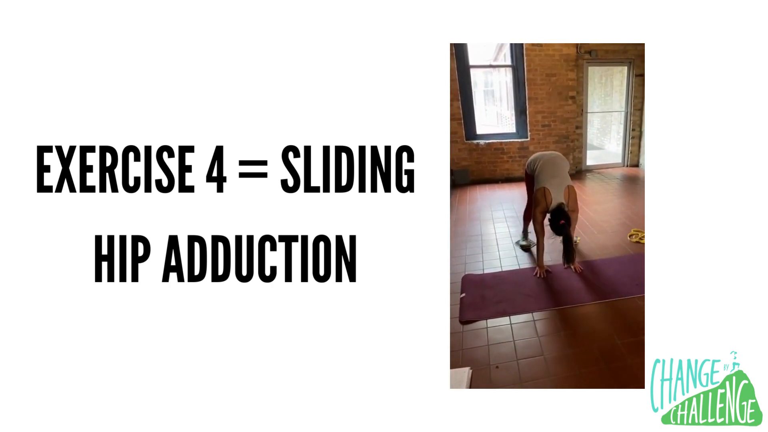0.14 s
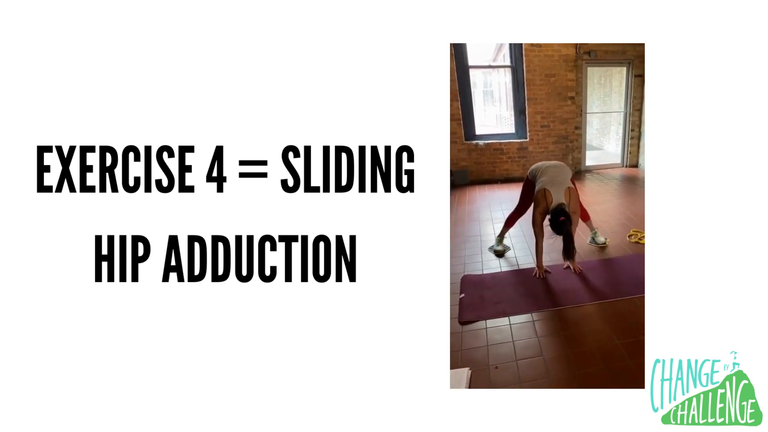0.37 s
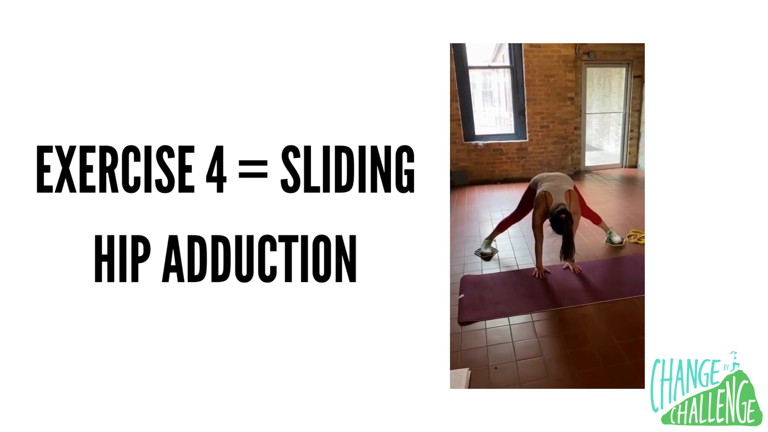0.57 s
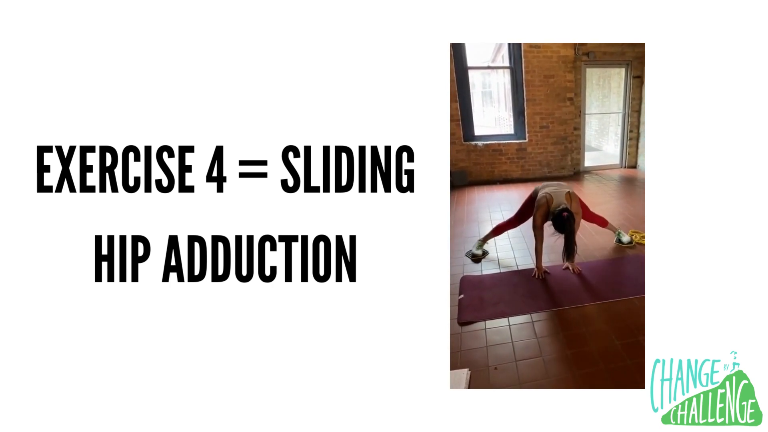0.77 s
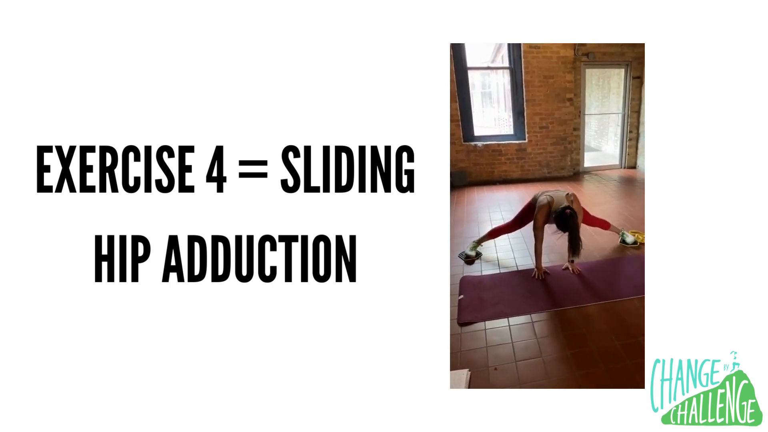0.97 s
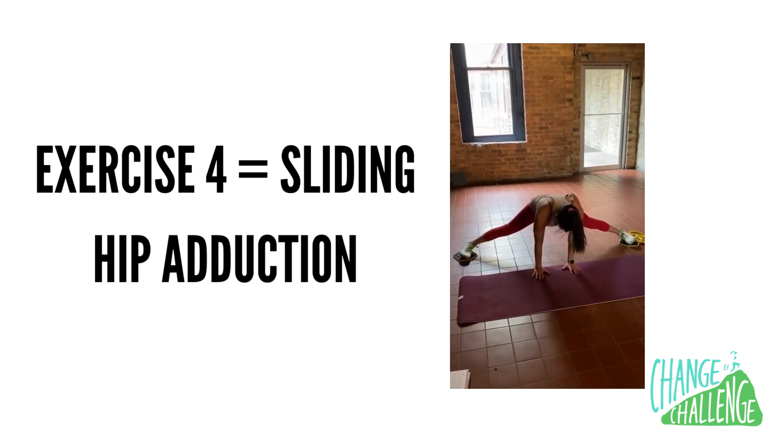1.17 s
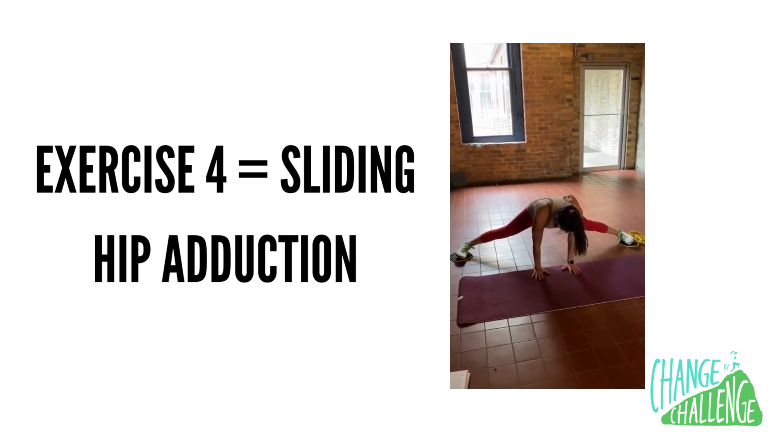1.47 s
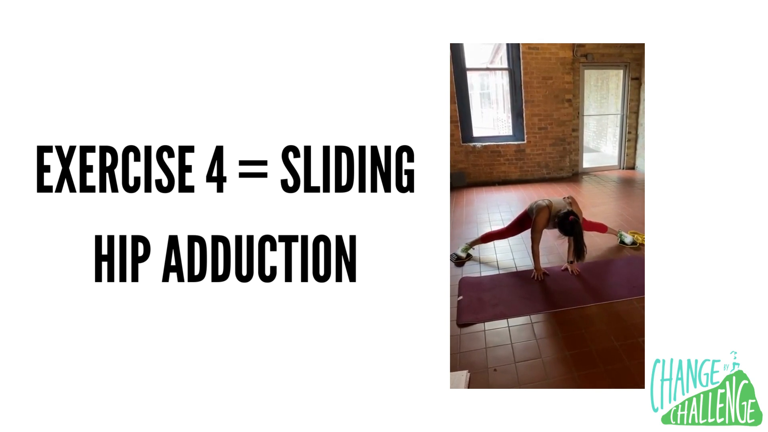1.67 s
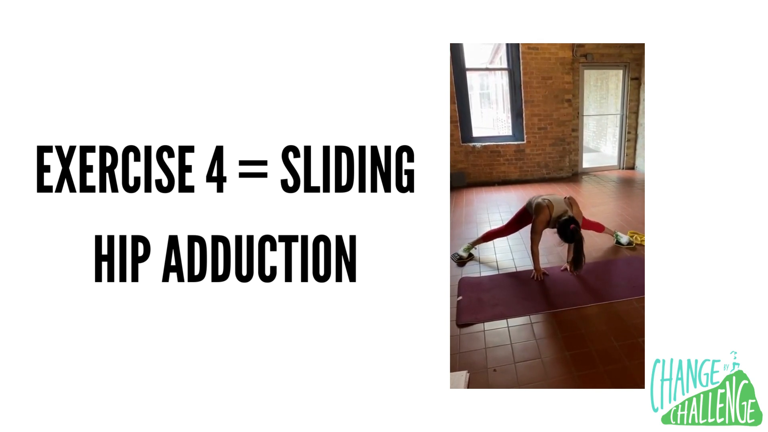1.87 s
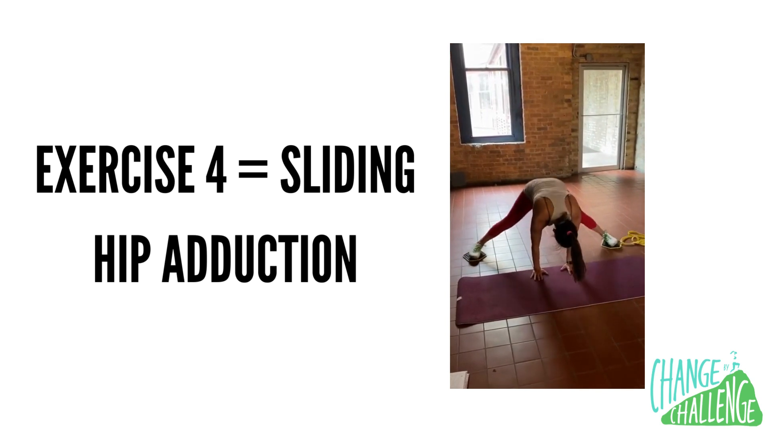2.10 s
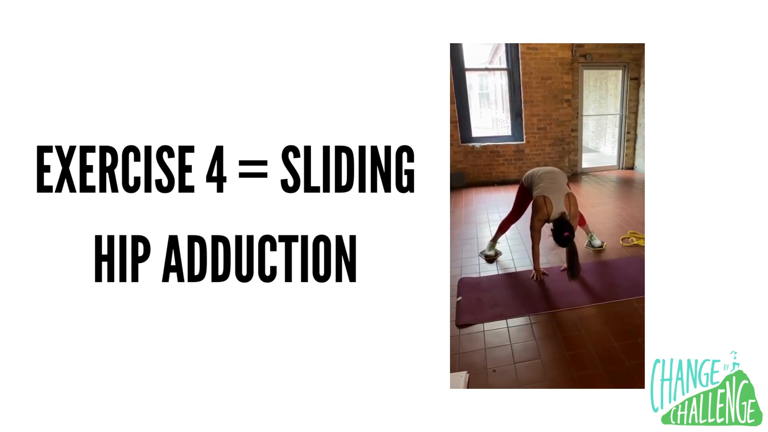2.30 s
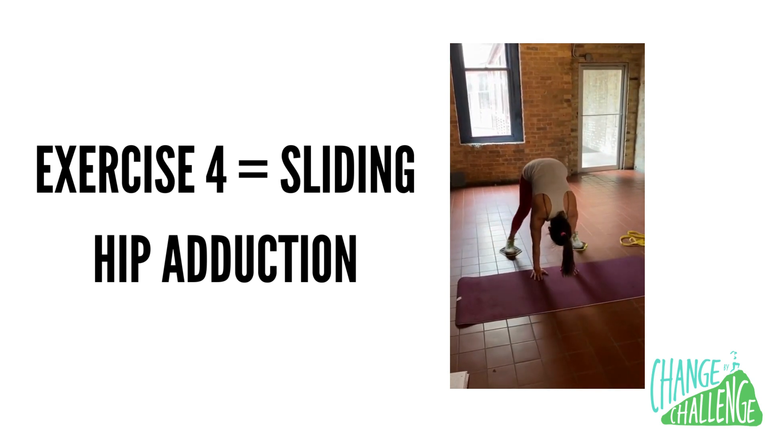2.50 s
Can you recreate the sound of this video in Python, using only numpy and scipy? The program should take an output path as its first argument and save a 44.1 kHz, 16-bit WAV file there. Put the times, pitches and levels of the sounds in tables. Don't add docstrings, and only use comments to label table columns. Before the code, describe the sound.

Felt sliders scrape out across a gritty tile floor, stop, then scrape back in, louder and brighter

```python
import sys
import numpy as np
from scipy import signal
from scipy.fft import rfft, irfft
from scipy.io import wavfile
from scipy.ndimage import uniform_filter1d

SR = 44100
rng = np.random.default_rng(int(sys.argv[2]) if len(sys.argv) > 2 else 0)


def elevation(decibels):
    levels = np.asarray(decibels, float)
    return 10 ** (levels / 20)


def master_out(mix):
    frames = np.transpose(np.atleast_2d(mix))
    ceiling = np.clip(frames, -1, 1)
    pcm = np.round(ceiling * 32767).astype(np.int16)
    wavfile.write(sys.argv[1], SR, pcm)


N = 116865
T = np.arange(N) / SR
F = np.fft.rfftfreq(N, 1 / SR) + 1e-3


def set_rms(x, db):
    return x * elevation(db) / np.sqrt(np.mean(x ** 2))


def curve(table):
    hz, value = np.array(table).T
    return np.interp(np.log(F), np.log(hz), value)


def shape(x, gain):
    return irfft(rfft(x) * gain, N)


def walk(rate):
    hold = int(SR / rate)
    steps = np.repeat(rng.standard_normal(400)[:N // hold + 1], hold)
    return 1.4 * uniform_filter1d(uniform_filter1d(steps, hold), hold)[:N]


def move_bands(x, centres, db_of):
    position = np.interp(np.log(F), np.log(centres), np.arange(len(centres)))
    out = 0
    for k, hz in enumerate(centres):
        band = shape(x, np.clip(1 - abs(position - k), 0, 1))
        out = out + elevation(db_of(hz)) * band
    return out


# frequency in Hz, level in dB, wobble in dB.
HUM_LINES = [(121.5, -41.5, 0.4), (239, -59.5, 3.5), (356.5, -55, 0.5), (275.2, -59.5, 4), (158, -53, 4),
             (71, -51.5, 5)]


def hum():
    out = 0
    for hz, db, wobble_db in HUM_LINES:
        gain = np.sqrt(2) * elevation(db + wobble_db * walk(12.4))
        drifting_hz = hz * (1 + .004 * walk(9.8))
        out = out + gain * np.sin(2 * np.pi * np.cumsum(drifting_hz) / SR)
    return out


# frequency in Hz, level in dB per Hz.
AIR_SPECTRUM = [(22, -49), (36, -21), (56, 1), (150, -8.5), (375, -19), (730, -29.5), (1420, -41),
                (5500, -63.5), (9000, -85.5)]


def air():
    noise = set_rms(shape(rng.standard_normal(N), elevation(curve(AIR_SPECTRUM))), -40)
    flicker_db = 2.05
    return move_bands(noise, 30 * 2 ** np.arange(0, 9.), lambda hz: flicker_db * walk(2.7))


def decay(t60):
    return rng.standard_normal(N) * elevation(-60 * T / t60) * (T > .008)


def room(x):
    places = 4
    low_pass = 1 / (1 + (F / 2500) ** 4)
    position = np.linspace(0, places - 1, N)
    out = 0
    for place in range(places):
        echo = shape(decay(1.03), low_pass) + shape(decay(.55), 1 - low_pass)
        echo = echo / np.sqrt(np.sum(echo ** 2))
        near = np.sqrt(np.clip(1 - abs(position - place), 0, 1))
        out = out + signal.fftconvolve(x * near, echo[:N // 2])[:N]
    return out


def in_room(x):
    wet = elevation(-8)
    return (x + wet * room(x)) / np.sqrt(1 + wet ** 2)


# time in seconds, level in dB, pitch in Hz.
GROUT_LINES = [
    (.11, -75, 495),
    (0.332, -41, 412.4),
    (.37, -40, 470),
    (.55, -47, 580),
    (.71, -43.5, 480),
    (2.12, -48.5, 410),
    (2.45, -43, 700),
]


def joints():
    noise = rng.standard_normal(N)
    out = 0
    for start, db, hz in GROUT_LINES:
        resonance = 1 / (1 + ((F - hz) / (0.027 * hz)) ** 2)
        out = out + set_rms(shape(noise, resonance), db) * np.exp(-((T - start) / 0.02) ** 2)
    return out


# time in seconds, scrape level in dB, brightness in dB per octave,
# pad ring in dB, pad ring pitch in Hz.
STROKES = [(0, -66.5, -14.5, 1, 2000), (.07, -63.5, 2, .1, 2200), (.098, -50.5, .1, 2, 2200),
           (0.113, -38.5, -0.2, 3.5, 2350), (.2, -34, -0.7, 3.5, 2400), (0.258, -28.5, 0.04, 2.3, 2180),
           (.44, -27.5, 0.64, 3, 2600), (.6, -31, 0.46, 5, 1900), (1.04, -44, -0.8, -0.1, 2220),
           (1.15, -57, 2.7, 5, 2200), (1.45, -51, 0.9, -1.5, 2200), (1.6, -64.5, 1.5, 6, 2200),
           (1.84, -87.5, -1, -2.5, 2200), (1.89, -64.5, 5, 4, 2200), (1.99, -44.5, 0.7, -1, 2400),
           (2.33, -33.5, 0.44, 2.7, 2100), (2.44, -34, 0.34, 0.8, 2200), (2.6, -31, 0.4, 4.5, 1670)]
# frequency in Hz, level in dB per Hz.
SCRAPE_SPECTRUM = [(150, -36), (300, -12.5), (1200, -4.5), (1520, -2), (2900, -3), (4400, -6.5),
                   (9500, -15), (15500, -28)]
# frequency in Hz, width in Hz, height in dB.
RINGS = [(2400, 1400, 2), (1700, 250, 0), (2820, 120, -1), (5300, 870, 5), (6510, 720, 3.5),
         (750, 150, 2.5)]


def scrape():
    grit_per_s, grit_spread_db = 5000, 1.5
    judder_db, chatter_db, patch_db = .4, .8, .6
    chance = rng.random((3, N))
    hit = chance[0] < grit_per_s / SR
    grit = hit * np.sign(chance[1] - .5) * elevation(-grit_spread_db * np.log(chance[2] + 1e-9))
    rub = rng.standard_normal(N) + set_rms(grit, -6)

    colour_db = curve(SCRAPE_SPECTRUM)
    for hz, width, db in list(RINGS) + [(6912, 50, 9)]:
        colour_db = colour_db + db / (1 + (2 * (F - hz) / width) ** 2)
    body = set_rms(shape(rub, elevation(colour_db)), 0.37)

    times, *columns = np.array(STROKES).T
    stroke_db, tilt, ring_db, ring_hz = [np.interp(T, times, column) for column in columns]
    unsteady_db = judder_db * walk(8.21) + chatter_db * walk(59.76)

    def band_db(hz):
        ring = ring_db * np.exp(-(np.log2(hz / ring_hz) / 0.32) ** 2)
        return tilt * np.log2(hz / 2500) + patch_db * walk(13) + ring

    body = move_bands(body, 250 * 2 ** np.arange(0, 6.1, .4), band_db)
    return body * elevation(stroke_db + unsteady_db)


# frequency in Hz, side level in dB relative to the mid.
WIDTH = [(60, -59), (120, -42.5), (200, -26), (380, -8.5), (700, -5), (1500, -7.5), (3000, -3.5),
         (6000, -6)]
# frequency in Hz, lead of the left port in radians.
PORT_LEAD = [(300, -.05), (900, -.4), (1600, -.1), (2600, .55), (3400, .55), (5000, .35), (6100, .7)]


def scene():
    pads = scrape() + joints()
    mid = in_room(pads)
    right_share = .04
    lagged = shape(mid, 1j * np.tan(curve(PORT_LEAD) / 2) - right_share * (F > 350))
    wet = elevation(-8)
    reflections = (scrape() + wet * room(pads)) / np.sqrt(1 + wet ** 2)
    side = lagged + shape(reflections + air(), elevation(curve(WIDTH)))
    mid = mid + air() + hum()
    return np.array([mid + side, mid - side])


def roll_off(x):
    return signal.sosfilt(signal.butter(12, 15710, fs=SR, output="sos"), x)


REGION_EDGES = [6300, 7030, 7500, 7850, 8250, 9600, 9790, 10300, 11000, 11350, 11700, 12050, 12750, 13050,
                13850, 14300, 15150, 15720]
# mid in dB, side in dB.
REGION_LEVELS = [(1.15, -3), (-1, -3), (3, -3), (4.7, -3), (2.1, 2), (-1, 6), (-21, -12), (1.4, -2),
                 (-2, 6), (-1, 4), (6, -6), (-1.5, -11), (-4, -15), (5, 2.5), (-5, -11), (1.5, -3),
                 (-9, -4.5)]
REGION_KEPT = [(1, 0), (.25, 0), (.45, 0), (.98, 0), (.98, .07), (.5, .9), (.2, .06), (.8, .06), (.7, .45),
               (.55, .2), (.7, .4), (.85, .08), (.04, .3), (.13, .8), (.03, .3), (.75, .2), (.16, .04)]


def record(dry):
    frame, strip_hz, hold_frames = 1024, 520, 3
    mid, side = (dry[0] + dry[1]) / 2, (dry[0] - dry[1]) / 2
    frames = dict(fs=SR, nperseg=2 * frame, noverlap=frame, window="cosine")
    hz, _, spec = signal.stft(np.array([mid, side, np.roll(mid, -300)]), **frames)
    region = np.searchsorted(REGION_EDGES, hz) - 1
    silent = (-99, -99, -1, -1)
    rows = np.vstack([np.hstack([REGION_LEVELS, REGION_KEPT]), silent])[region]
    start = np.array(REGION_EDGES)[region]
    strip = region * 4 + ((hz - start) // strip_hz).astype(int)

    luck = rng.standard_normal((2, 80, spec.shape[2]))
    luck = uniform_filter1d(luck, size=hold_frames, axis=2) * np.sqrt(hold_frames)
    draw = 1 / (1 + np.exp(-1.7 * luck[:, strip % 80]))
    gain, share = elevation(rows[:, :2].T)[:, :, None], rows[:, 2:].T[:, :, None]
    kept = np.clip((share - draw) * 60 + .5, 0, 1) ** 3 * gain

    below = (region < 0)[:, None]
    spec = np.where(below, spec[:2], kept * spec[::2])
    mid, side = signal.istft(spec, **frames)[1][:, :N]
    return roll_off(np.array([mid + side, mid - side]))


dry = scene()
out = record(dry)
master_out(out)
```